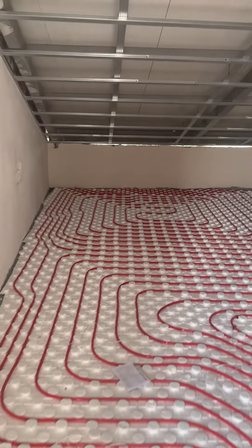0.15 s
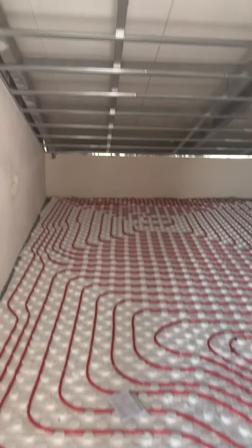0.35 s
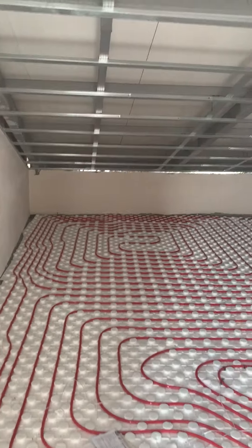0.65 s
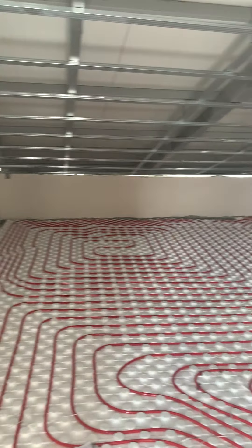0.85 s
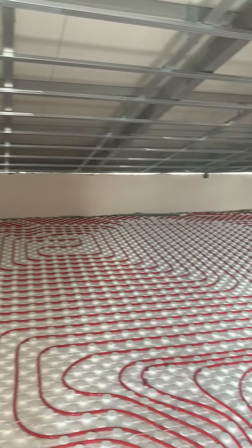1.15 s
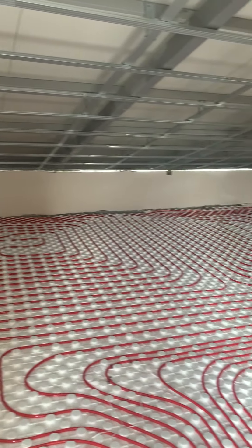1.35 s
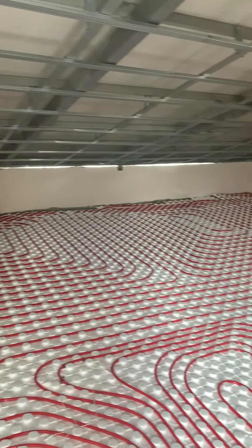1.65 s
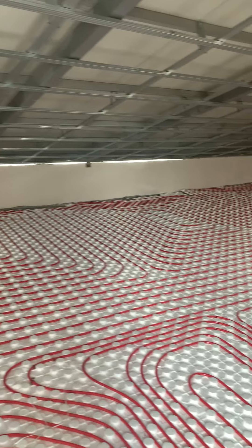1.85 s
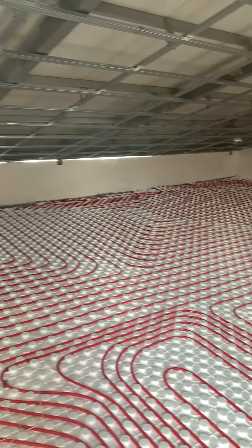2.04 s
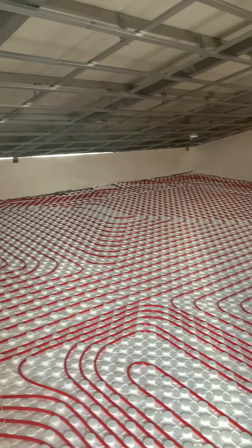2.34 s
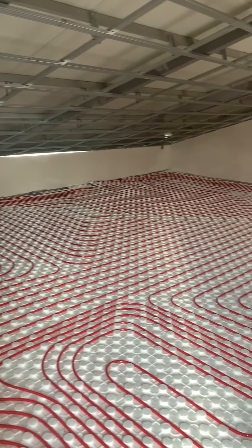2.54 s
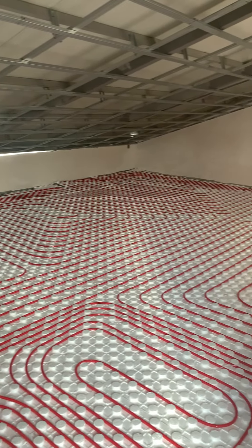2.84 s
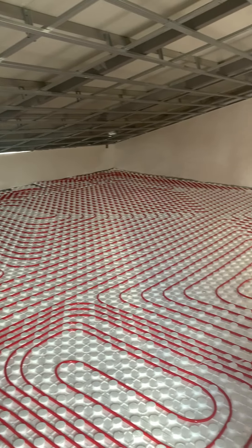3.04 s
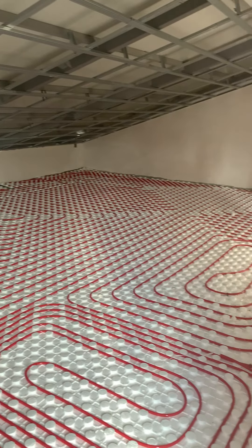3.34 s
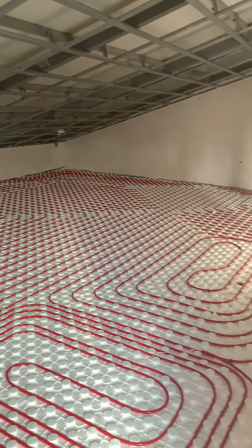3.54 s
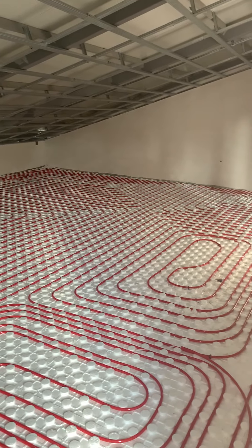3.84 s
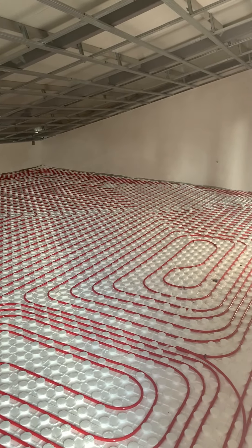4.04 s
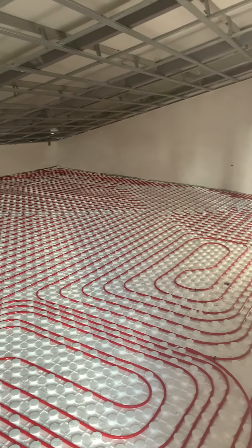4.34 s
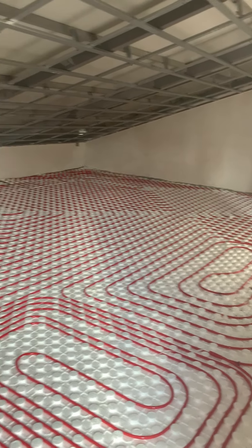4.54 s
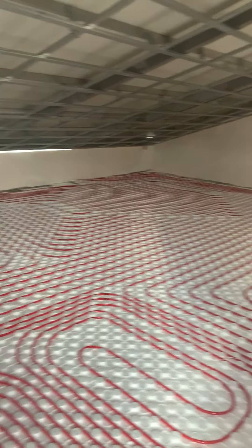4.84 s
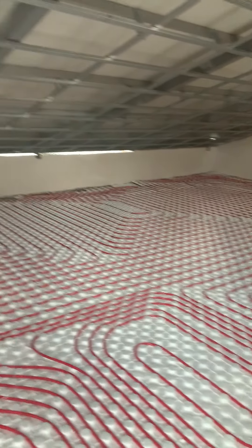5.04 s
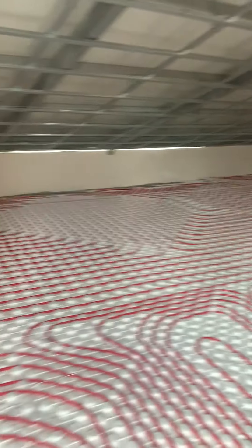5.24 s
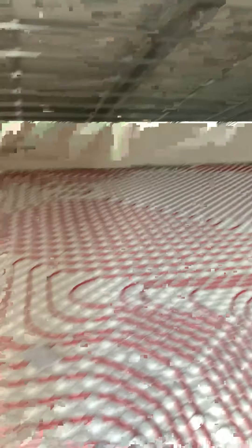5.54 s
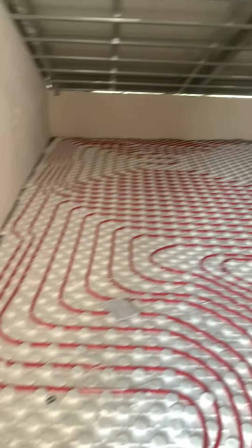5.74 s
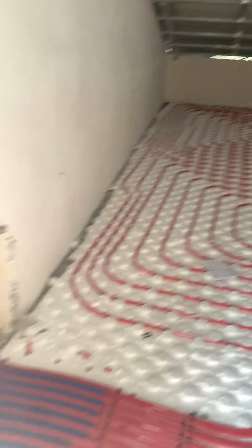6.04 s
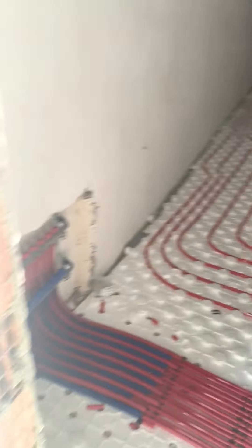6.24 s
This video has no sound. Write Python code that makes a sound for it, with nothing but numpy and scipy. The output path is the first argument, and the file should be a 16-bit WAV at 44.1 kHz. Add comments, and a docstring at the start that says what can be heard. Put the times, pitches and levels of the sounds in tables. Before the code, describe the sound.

Indoors, a constant motor hum starts distant and wide, then grows steadily nearer and fuller, with wavering overtones and a singing whine. Soft cloth rustle, a scuff and a sharp knock come in the first second, then mostly engine alone. In the last moments the person holding the microphone turns quickly: low rumble, fabric swishes, ringing scuffs and small ticks, with slight hard-wall reflections.

```python
"""A six-cylinder engine hums outside a bare room, wide at first, with whine, roar, clatter and a beating drone.
In the first second shoes scuff and tick on plastic floor panels and clothes rustle; one knock follows.
The engine grows louder on approach: harmonics and noise tied to one shaft, some overtones coming and going.
In the last two seconds clothes stir again, then a quick turn: rumble, ringing scuffs, ticks.
Movement is shaped noise, answered by the walls; faint air hiss lies under it all."""
import sys
import numpy as np
from scipy import signal
from scipy.fft import rfft, irfft, next_fast_len
from scipy.io import wavfile
from scipy.ndimage import uniform_filter1d, map_coordinates

SR = 44100
rng = np.random.default_rng(int(sys.argv[2]) if len(sys.argv) > 2 else 0)


def transcribe(u):
    """Save the signal u as a 16-bit wav file named by the first command-line argument.

    u: samples, shape (n,) or (channels, n), limited to [-1, 1]; the rate is SR.
    q: integer samples, one column per channel.
    """
    v = np.clip(np.atleast_2d(u).T, -1, 1)
    q = np.round(v * 32767).astype(np.int16)
    wavfile.write(sys.argv[1], SR, q)


N = 281358

TOP_HZ = 14350
CYCLE_HZ, SPEED_UP_HZ_PER_S = 17.425, 0.008
FAR_DB = -45.5  # approach level at which each law gives its start level
# depths of random gain
GRIT_DB, CATCH_DB = 2.0, 1.4
FIRING_WAVER_DB, ORDER_WAVER_DB, ROAR_WAVER_DB = 0.3, 1.3, 0.4
RING_FLUTTER_DB = 2.5
ROAR_PATCH_DB, CLATTER_PATCH_DB, CLOTH_PATCH_DB = 0.8, 2.0, 2.8

# stereo width of noise: freq_hz, side_over_mid_db
WIDTH_DB = [(60, -52.5), (150, -58), (380, -48), (520, -13), (680, 10.5), (1000, 16), (1350, 5), (2600, 11),
            (3900, -1), (5000, 5.5), (7000, -7), (8800, 9), (12000, -3.5), (14000, -2.5)]
# share of the side a quarter turn ahead of the mid, positive = left first: freq_hz, share
LEAD_SHARE = [(550, -.5), (800, -.2), (1300, 0.1), (2000, .4), (3200, .6), (4500, .65), (7000, .35),
              (8500, .7), (11000, -.4), (13500, .3)]
# air hiss spectrum: freq_hz, relative_density_db
AIR_SPECTRUM = [(100, 21.5), (1500, -7.0), (4000, 10.0), (6000, 1.5), (7500, -17), (10000, -35.0), (14000, -26.5)]
# wall decay: freq_hz, t60_s
WALL_T60_S = [(300, 0.56), (2000, 0.36), (6000, 0.57), (14000, 0.25)]
# handling rumbles: peak_s, level_db, length_s
RUMBLES = [(5.48, -32, 0.63), (6.15, -44.5, 0.7)]
# rumble spectrum: freq_hz, relative_density_db
RUMBLE_SPECTRUM = [(18, -30), (32, -7), (42, 6), (70, -6), (130, -7.5), (250, -39), (600, -75)]
# clothing swishes, one per movement: peak_s, relative_level_db, length_s
SWISHES = [(.08, -52, 1), (.25, -55, 1), (.48, -56, 1), (.83, -58.5, 0.87), (1.09, -51.5, 0.79),
           (1.26, -55.5, 0.72), (4.5, -53.5, 0.46), (5.15, -50, 0.4), (5.37, -42, 0.57),
           (5.71, -43.5, 0.11), (5.88, -39.5, 0.33), (6.1, -37.5, 0.44), (6.31, -44.5, 0.83)]
# cloth spectrum: freq_hz, relative_density_db
CLOTH_SPECTRUM = [(300, 11), (800, 5.5), (1200, 6.5), (1850, 8.5), (2500, -2), (3500, 3.5), (5000, 0),
                  (6500, 2.5), (8300, -5), (9700, -21.5), (12000, -4.5), (14000, -13)]
# sliding soles: peak_s, friction_level_db, length_s, ring_hz, ring_over_friction_db, treble_shelf_db
SCUFFS = [(0.083, -56, 0.082, 1320, 8, 2.5), (0.163, -63.5, 0.77, 860, 26, 0.5),
          (0.765, -37.5, 0.096, 1220, 5.5, 6), (0.826, -52.5, 0.45, 1920, 7, -3.5),
          (5.345, -48, .18, 1780, -6, -2), (5.69, -46, 0.094, 1489, -5, -5.5),
          (5.891, -39, 0.17, 1750, -2, 4), (5.97, -43.5, 0.12, 1783, 8.5, 10),
          (6.09, -39, 0.12, 1830, 10, 3), (6.19, -45.5, 0.12, 1230, 20.5, -1),
          (6.284, -50.5, 0.13, 881, 24, 5.5)]
# sole friction spectrum: freq_hz, relative_density_db
SOLE_SPECTRUM = [(400, 17.5), (800, 0.5), (1050, -3), (1250, 12), (1600, 11), (1900, 11), (2450, 6),
                 (3400, 8.5), (5500, 2.5), (9000, -14), (14000, -10)]
# panel ticks, crackles, knocks: start_s, relative_level_db, pitch_hz, t60_s, density_at_3x_pitch_db
TICKS = [(0.104, -38.5, 4500, 0.015, -14.5), (0.375, -43.5, 6500, 0.049, -12.5),
         (0.721, -40, 6200, .02, -3.5), (0.742, -35, 3920, .015, -6), (0.758, -29.5, 2480, 0.035, -15),
         (0.76, -30.5, 1160, 0.038, -7), (0.761, -30, 3440, 0.015, -16.5), (0.776, -33, 3360, .02, -20),
         (1.498, -33.5, 670, 0.063, -36), (5.091, -28, 3870, 0.018, -18.5), (5.872, -28.5, 3300, .018, -16),
         (5.909, -29, 3250, 0.022, -20), (6.092, -32, 3300, .016, -16), (6.113, -31, 1890, .03, -12),
         (6.172, -41.5, 5800, 0.018, -23), (6.217, -31, 1700, 0.019, -18),
         (6.236, -26.5, 3700, 0.03, -19.5)]
# drone envelope: time_s, relative_level_db
DRONE_DB = [(0.0, -49), (0.07, -48), (1.67, -45), (2.27, -55.5), (3.48, -35), (3.94, -45), (4.62, -39),
            (5.19, -52), (5.44, -36), (6.38, -35)]
# approach followed by the engine laws: time_s, approach_db
APPROACH_DB = [(0, -45), (0.3, -41.5), (0.75, -40), (1.3, -37), (2.1, -35), (3.2, -32.5), (4.3, -30),
               (5.1, -30.5), (5.8, -26.5), (6.38, -26.5)]
# turn through the standing waves: time_s, half_whine_phase_gap_rad
BEARING_RAD = [(0, 1.28), (.6, 1.5), (.76, 0.72), (.95, 0.19), (3.2, 0.067), (4.3, 0.13), (4.75, 0.25),
               (5.5, 0.48), (6.05, 0.034)]
# opening of hum and roar: time_s, half_phase_gap_at_reference_pitch_rad (before limiting)
SPREAD_RAD = [(0, 0.61), (.35, 1.06), (.49, 1.35), (.56, 1.5), (.61, 1.5), (.67, 0)]
# layer laws: start_db, growth_db_per_approach_db, turn_db_per_rad
HISS_LAW = (-96, 0.98, 0)
CLATTER_LAW = (-71.5, 1.38, -7.5)
ROAR_LAW = (-55, 1.09, 2.66)
WHINE_LAW = (-57, 1.3, 6.2)
FIRING_LAW = (-45.5, 0.91, -0.72)
# thin engine hiss spectrum: freq_hz, relative_density_db
HISS_SPECTRUM = [(3000, -10.5), (6000, 3.5), (8500, -0.5), (10000, -19), (11500, 16.5), (13200, 0.5),
                 (14300, -14)]
# whirring resonance spectrum: freq_hz, relative_density_db
RING_SPECTRUM = [(900, -33), (1130, -4), (1220, 4), (1310, 7), (1430, -2.5), (1900, -35)]
# whirring resonance envelope: time_s, level_db
RING_DB = [(0, -79), (1.8, -67.5), (2.8, -64), (3.9, -57.5), (4.6, -57), (5.2, -67.5), (6.38, -61)]
# clatter spectrum: freq_hz, relative_density_db
CLATTER_SPECTRUM = [(500, 0), (660, -5), (800, 6.5), (1050, -1.5), (1300, 4.5), (1550, 6), (2050, 3),
                    (2500, -4.5), (3600, 0), (5000, -6), (6200, -2.5), (8000, -12.5), (14000, -68)]
# exhaust spectrum: freq_hz, relative_density_db
ROAR_SPECTRUM = [(22, -30), (35, -18), (48, 10), (80, 4), (130, 4), (175, -1), (260, -2.5), (350, 4.5),
                 (420, 0), (500, 1), (570, -5.5), (660, -15), (900, -34.5), (1500, -100)]
# overtones through standing waves: cycle_multiple, [(time_s, mid_db, side_db)]
OVERTONES = [(20, [(0, -54, -53), (1, -59.5, -79.5), (4.7, -53, -85), (5.3, -40, -62), (6.38, -46.5, -99)]),
             (34, [(0, -77, -71), (.6, -75, -63), (1.2, -58.5, -59), (3.7, -51, -56), (5.3, -69.5, -47),
             (6.38, -56, -62)]), (40, [(0, -75, -64), (1.2, -63, -50.5), (3.3, -63, -57.5), (4.5, -93, -61),
             (5.1, -66.5, -54), (5.9, -53, -52), (6.38, -50, -50)]), (75, [(0, -89, -75), (2.4, -70, -66.5),
             (3.8, -63.5, -62), (4.7, -61, -51), (5.2, -74, -54), (5.75, -73, -46), (6.05, -50, -39),
             (6.38, -58, -59)])]
# engine orders, relative to the firing law: cycle_multiple, mid_db, side_db
ORDERS = [(4, -16.5, -68.5), (6, 0.65, -71.5), (7, -10.5, -74), (9, -16, -72.5), (10, -18, -83.5),
          (11, -27, -68), (12, -10.5, -75), (13, -20.5, -72), (15, -15, -82.5), (16, -25.5, -64.5),
          (28, -48, -34.5), (30, -23.5, -32), (31, -27.5, -43.5), (35, -32, -26)]


def amp(db):
    """Decibels to gain."""
    return 10 ** (np.asarray(db) / 20)


def unit(x):
    """Scale to rms 1."""
    return x / np.sqrt(np.mean(x ** 2) + 1e-20)


def along(points, hz):
    """Interpolate (freq_hz, value) points on a log axis."""
    point_hz, values = np.transpose(points)
    return np.interp(np.log(hz + 1), np.log(point_hz + 1), values)


def curves(rows):
    """One value per sample for each column after the time."""
    time_s, *columns = np.transpose(rows)
    return [np.interp(np.arange(N) / SR, time_s, column) for column in columns]


def wobble(knots_per_s):
    """Smooth random curve."""
    knots = rng.standard_normal(int(N * knots_per_s / SR) + 4)
    return map_coordinates(knots, [np.arange(N) * knots_per_s / SR])


def filtered(x, response):
    """Apply a frequency response."""
    size = next_fast_len(N + SR // 2)
    hz = np.fft.rfftfreq(size, 1 / SR)
    return irfft(rfft(x, size) * response(hz), size)[..., :N]


def white():
    """Two independent white noises."""
    return rng.standard_normal((2, N))


def rush(source, spectrum):
    """Colour noise into (mid, side), mid at rms 1; the side is part quarter-turn mid, part diffuse."""
    size = next_fast_len(N + SR // 8)
    hz = np.fft.rfftfreq(size, 1 / SR)
    mid, diffuse = rfft(source, size) * amp(along(spectrum, hz))
    lead = along(LEAD_SHARE, hz)
    side = amp(along(WIDTH_DB, hz)) * (1j * lead * mid + np.sqrt(1 - lead ** 2) * diffuse)
    pair = irfft(np.array([mid, side]), size)[:, :N]
    return pair / np.std(pair[0])


def patchy(noise, depth_db):
    """Random gain in shifting time-frequency patches."""
    bins = signal.stft(noise, nperseg=1024)[2]
    field = rng.standard_normal(bins.shape[1:])
    field = uniform_filter1d(field, size=7, axis=0)
    field = uniform_filter1d(field, size=5, axis=1)
    return signal.istft(bins * amp(depth_db * unit(field)), nperseg=1024)[1][:, :N]


def cyclic(cycle, share, steps_per_cycle=2500):
    """White noise blended with a low-passed pattern that recurs every engine cycle."""
    step = (cycle * steps_per_cycle).astype(int) % steps_per_cycle
    pattern = rng.standard_normal((2, steps_per_cycle))[:, step]
    repeat = filtered(pattern, lambda hz: 1 / np.sqrt(1 + (hz / 1800) ** 4))
    return np.sqrt(share) * repeat + np.sqrt(1 - share) * white()


def tone(turns):
    """Sine of rms 1 as (mid, side) in quadrature, for equal level left and right."""
    phase = 2 * np.pi * (turns + rng.random())
    return np.sqrt(2) * np.array([np.sin(phase), -np.cos(phase)])


def stroke(peak_s, length_s, rise_share):
    """Gain of one movement: 20 dB up to the peak and 20 dB down within its length."""
    t = (np.arange(N) / SR - peak_s) / length_s
    return amp(-20 * np.maximum(-t / rise_share, t / (1 - rise_share)))


def strokes(rows, rise_share):
    """Gain of overlapping movements, powers added."""
    gains = [amp(db) * stroke(peak_s, length_s, rise_share) for peak_s, db, length_s in rows]
    return np.sqrt(sum(gain ** 2 for gain in gains))


def heard_db(law):
    """Engine layer level: follows the approach and the turn through standing waves."""
    start_db, growth, turn_db_per_rad = law
    approach_db, = curves(APPROACH_DB)
    bearing_rad, = curves(BEARING_RAD)
    return start_db + growth * (approach_db - FAR_DB) + turn_db_per_rad * bearing_rad


def air_hiss():
    """Steady coloured noise."""
    return amp(-62.0) * rush(white(), AIR_SPECTRUM)


def room(x):
    """Reflections off bare plaster: decaying noise with a frequency-dependent t60."""
    hz, t, bins = signal.stft(rng.standard_normal((2, SR)), SR, nperseg=256)
    decay = amp(-60 * t / along(WALL_T60_S, hz)[:, None])
    tail = signal.istft(bins * decay, SR, nperseg=256)[1]
    return signal.fftconvolve(x, tail / np.linalg.norm(tail[0]), axes=1)[:, :N]


def rumble():
    """Handling during the quick turn: low noise in slow, uneven swells."""
    gain = strokes(RUMBLES, rise_share=0.63) * amp(2.8 * wobble(6.5))
    return gain * rush(white(), RUMBLE_SPECTRUM)


def clothes(grain_db=1.0):
    """Cloth rubs in many small catches as the body turns."""
    swish = strokes(SWISHES, rise_share=0.53) * amp(1.5 * wobble(30))
    grain = unit(amp(grain_db * wobble(500)))
    return swish * grain * rush(patchy(white(), CLOTH_PATCH_DB), CLOTH_SPECTRUM)


def scuffs(ring_width_hz=120, bright_hz=7000):
    """A sole drags harder over grit, catching and slipping, then lets go; the panel resonates with it."""
    catches = unit(amp(GRIT_DB * wobble(600) + CATCH_DB * wobble(130)))
    friction = catches * rush(patchy(white(), depth_db=3.5), SOLE_SPECTRUM)
    out = np.zeros((2, N))
    for peak_s, db, length_s, ring_hz, ring_db, treble_db in SCUFFS:
        def response(hz):
            """Panel resonance and treble shelf."""
            damping = 1j * hz * ring_width_hz
            panel = 1 + amp(ring_db) * damping / (ring_hz ** 2 - hz ** 2 + damping)
            shelf = amp(treble_db * hz ** 4 / (hz ** 4 + bright_hz ** 4))
            return panel * shelf
        rubbing = amp(db) * stroke(peak_s, length_s, rise_share=0.51) * friction
        out += filtered(rubbing, response)
    return out


def ticks(trim_db=-6.5):
    """Panels crack: short, broadly tuned noise; the lower the pitch, the softer the onset."""
    out = np.zeros((2, N))
    for start_s, db, hz, t60_s, treble_db in TICKS:
        age_s = np.maximum(np.arange(N) / SR - start_s, 0)
        spectrum = [(hz / 5, -22), (hz / 2, -5), (hz, 0), (hz * 1.4, -6), (hz * 3, treble_db), (hz * 8, -55)]
        onset = 1 - np.exp(-age_s * hz / 2)
        decay = amp(db + trim_db - 60 * age_s / t60_s)
        out += onset * decay * rush(white(), spectrum)
    return out


def drone(hz=58.16, drift_turns=0.099, swell_db=2.0, trim_db=-0.5):
    """A low wavering tone off the engine's orders beats against them."""
    turns = hz * np.arange(N) / SR + drift_turns * wobble(3.9)
    level = amp(curves(DRONE_DB)[0] + trim_db + swell_db * wobble(6.7))
    return [[1], [0]] * level * tone(turns)  # mid only


def engine_hiss():
    """Thin, even noise following the approach."""
    return amp(heard_db(HISS_LAW)) * rush(white(), HISS_SPECTRUM)


def whirr(cycle):
    """Fluttering narrow-band resonance in the clatter, partly repeating each cycle."""
    level = amp(curves(RING_DB)[0] + RING_FLUTTER_DB * wobble(35))
    return level * rush(cyclic(cycle, share=0.054), RING_SPECTRUM)


def clatter(cycle):
    """Patchy mechanical noise, partly repeating each cycle."""
    level = amp(heard_db(CLATTER_LAW) + 0.35 * wobble(25))
    return level * rush(patchy(cyclic(cycle, share=0.26), CLATTER_PATCH_DB), CLATTER_SPECTRUM)


def roar(cycle):
    """Exhaust noise puffs at the firing rate, six per cycle."""
    firing = tone(6 * cycle)[0]
    noise = rush(patchy(cyclic(cycle, share=0.19), ROAR_PATCH_DB), ROAR_SPECTRUM)
    level = amp(heard_db(ROAR_LAW) + ROAR_WAVER_DB * wobble(10))
    return level * noise * (1 + 0.15 * firing)


def overtones(cycle, drift_turns=0.048, waver_db=2.0):
    """Higher orders swell and vanish through the room's standing waves."""
    out = np.zeros((2, N))
    for multiple, levels in OVERTONES:
        level = amp(curves(levels) + waver_db * wobble(9))
        out += level * tone(multiple * cycle + drift_turns * wobble(4.8))
    return out


def whine(cycle, flutter_db=1.0, drift_turns=0.0054):
    """A driven part sings at 27 times the cycle rate, shaken by the engine."""
    bearing_rad, = curves(BEARING_RAD)
    level = amp(heard_db(WHINE_LAW) + flutter_db * wobble(30))
    gap = np.array([np.cos(bearing_rad), np.sin(bearing_rad)])
    return level * gap * tone(27 * cycle + drift_turns * wobble(30))


def hum(cycle, drift_turns=0.047):
    """Six firings a cycle make the main line; unequal cylinders add wavering orders around it."""
    out = np.zeros((2, N))
    for order, mid_db, side_db in ORDERS:
        main = order == 6
        waver = amp((FIRING_WAVER_DB if main else ORDER_WAVER_DB) * wobble(9.0))
        drift = (not main) * drift_turns * wobble(8.3)
        out += amp([[mid_db], [side_db]]) * waver * tone(order * cycle + drift)
    return amp(heard_db(FIRING_LAW)) * out


def spread(pair, ref_hz=470, limit_rad=1.42):
    """Left-right phase gap growing with frequency: the middle thins while the sides fill."""
    hz, t, (mid, side) = signal.stft(pair, SR, nperseg=2048)
    turn_rad = np.interp(t, *np.transpose(SPREAD_RAD)) * hz[:, None] / ref_hz
    turn_rad = np.minimum(turn_rad, limit_rad)
    opened = np.array([np.cos(turn_rad) * mid, side - 1j * np.sin(turn_rad) * mid])
    return signal.istft(opened, SR, nperseg=2048)[1][:, :N]


def engine():
    """One slightly accelerating shaft drives the tonal lines and the cyclic noise."""
    cycle = np.cumsum(CYCLE_HZ + SPEED_UP_HZ_PER_S * np.arange(N) / SR) / SR
    noise = engine_hiss() + whirr(cycle) + clatter(cycle)
    lines = overtones(cycle) + whine(cycle)
    return noise + lines + spread(roar(cycle) + hum(cycle))


def scene():
    """Sum all sources; mid and side to left and right."""
    moves = clothes() + scuffs() + ticks()
    background = air_hiss() + amp(-10.0) * room(moves) + rumble()
    mid, side = background + moves + drone() + engine()
    return np.array([mid + side, mid - side])


def record(dry, low_cut_hz=33):
    """Roll off the deepest bass; cut everything from the band limit up."""
    return filtered(dry, lambda hz: (1 - 1 / (1 + (hz / low_cut_hz) ** 6)) * (hz < TOP_HZ))


dry = scene()
out = record(dry)
transcribe(out)
```